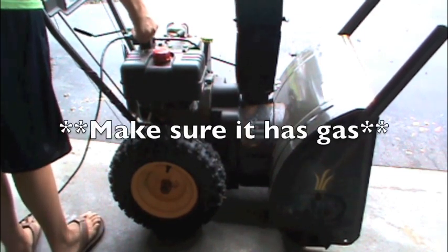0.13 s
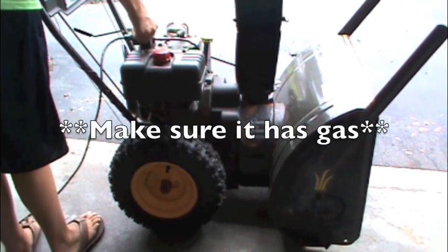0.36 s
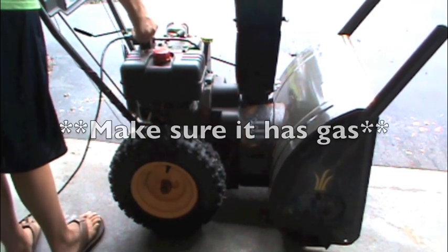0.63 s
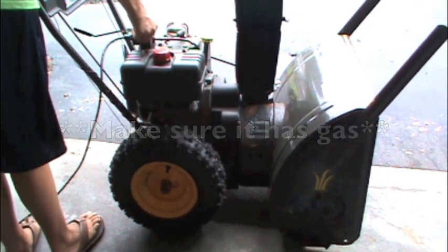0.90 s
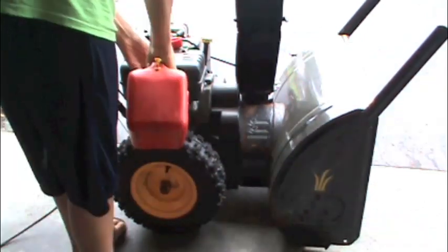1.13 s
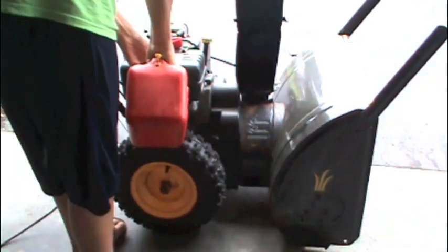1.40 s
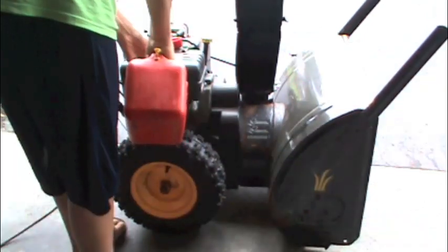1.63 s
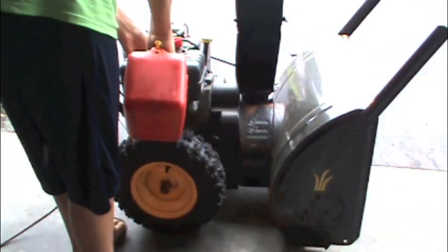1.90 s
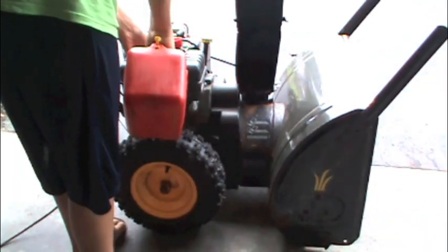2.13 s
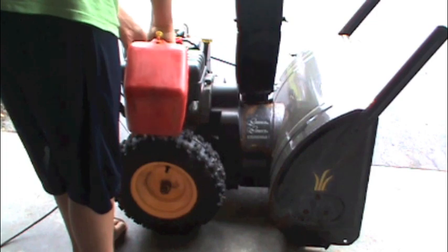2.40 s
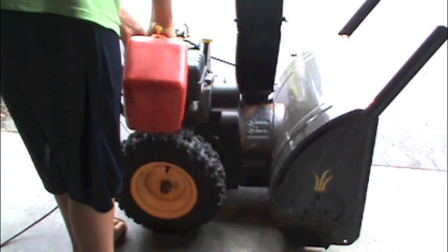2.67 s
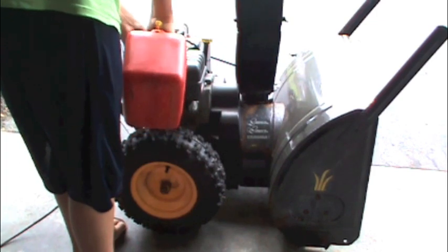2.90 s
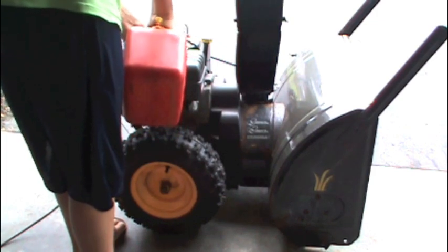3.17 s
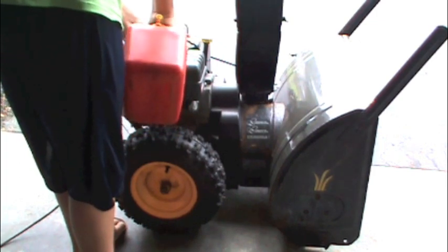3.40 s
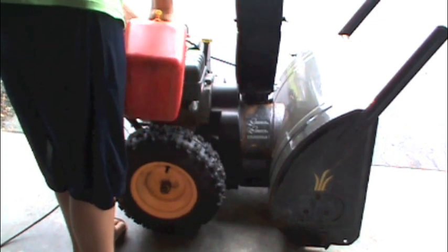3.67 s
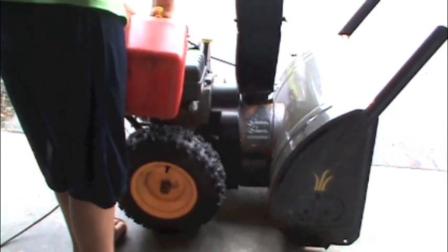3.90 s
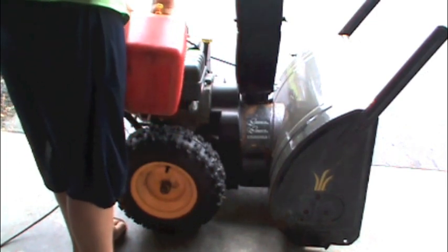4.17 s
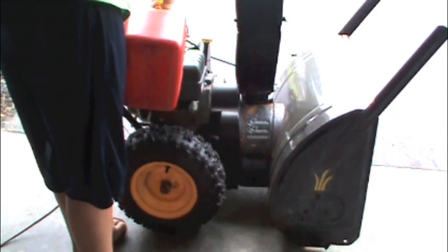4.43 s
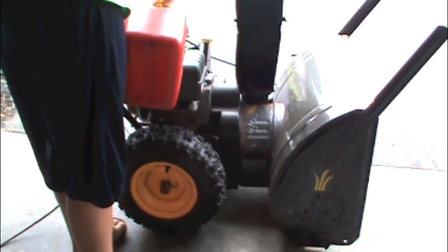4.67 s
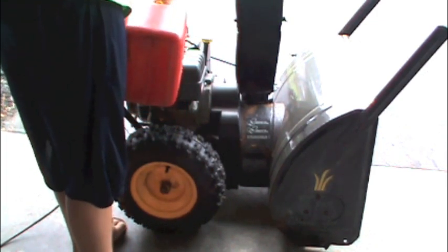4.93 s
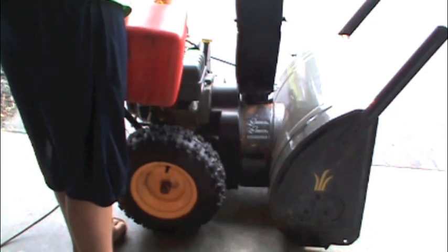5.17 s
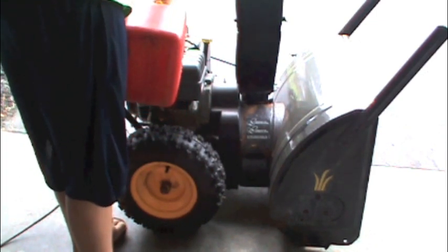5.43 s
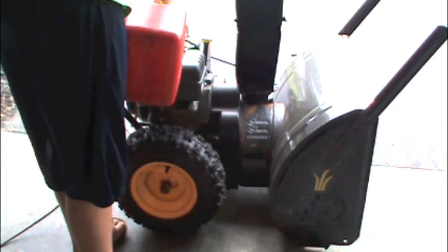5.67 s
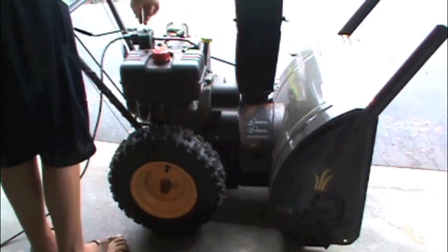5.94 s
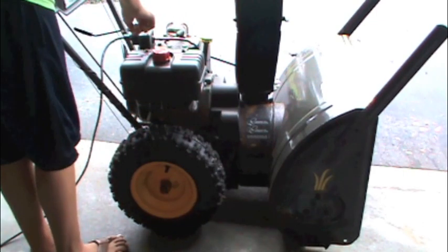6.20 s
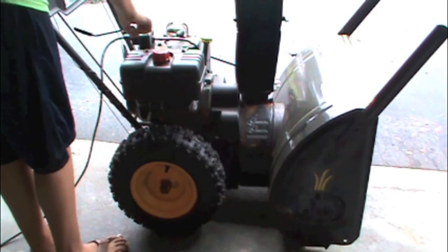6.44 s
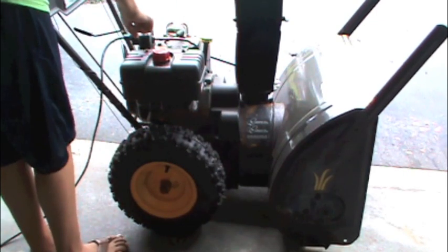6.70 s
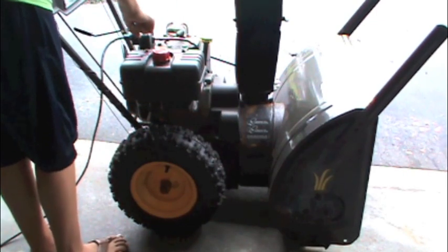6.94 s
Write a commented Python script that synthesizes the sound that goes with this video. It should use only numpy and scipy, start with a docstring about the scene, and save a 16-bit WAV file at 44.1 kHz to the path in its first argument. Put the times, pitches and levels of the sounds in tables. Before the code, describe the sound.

Harsh, pulsing starter-motor cranking, then near-silent outdoor hush with crickets, tiny clicks and can knocks, ending in a rough rising starter growl.

```python
"""At an open garage door, a mains electric starter cranks a small single-cylinder engine that does not catch.
Gear noise and a whine are paced by the pinion teeth on the flywheel gear, and air noise puffs out once a cycle.
After a fade, a quiet yard: filtered-noise rumble, traffic and crickets, steady hum tones, a buzzing, clicking
lens motor, a far bird's falling whistle, a plastic fuel can handled with noise rubs and ringing bursts, low knocks.
Past another fade in the yard, the starter is pressed again and its tooth tone climbs as it spins up."""
import sys
import numpy as np
from scipy import signal
from scipy.fft import rfft, irfft, next_fast_len
from scipy.io import wavfile
from scipy.ndimage import uniform_filter1d

SR = 44100
rng = np.random.default_rng(int(sys.argv[2]) if len(sys.argv) > 2 else 0)


def unload_audio(sound):
    """Save the sound as a 16-bit wav file, at the path given as the first command line argument."""
    columns = np.transpose(np.atleast_2d(sound))
    # keep every value between -1 and 1, then stretch to whole-number steps
    steps = np.round(np.clip(columns, -1, 1) * 32767)
    wavfile.write(sys.argv[1], SR, steps.astype(np.int16))


def boost(x):
    """Linear amplitude factor 10**(x/20) for a level x in decibels (scalar or array-like)."""
    u = np.asarray(x, float) / 20
    return 10 ** u


N = 311787
T = np.arange(N) / SR  # s

# All source levels are set ahead of the final gain; spectra are relative, as coloured() evens out their level.
# master fades: (time [s], gain [0-1])
FADER = [(0, 1), (.975, 1), (1.082, 0), (1.125, .3), (1.155, 1), (5.855, 1), (5.952, 0), (6.02, 1),
         (7.07, 1)]
CRANKING_END_S, SECOND_FADE_S = FADER[2][0], FADER[6][0]  # the moments of silence
# gear noise while cranking: (frequency [Hz], relative density [dB per Hz])
CRANK_SPECTRUM = [(18, -56), (30, -28.5), (93, -19), (161, -11), (252, -10), (287, -6), (328, -8),
                  (554, -6.5), (822, -9.5), (1720, -4.5), (2060, -12.5), (3980, -12), (5740, -14.5),
                  (6550, -12.5), (16000, -29)]
# housing, shroud and gear resonances: (frequency [Hz], width [Hz], boost [dB])
BODY = [(160.4, 14, 8), (221.7, 49, 6), (299, 12.7, 9), (408.4, 46, 4), (539.6, 50, 3), (671, 77, 1.5),
        (771, 43, 6), (984, 75, 4.5), (1172, 11, 5.5), (1318, 24, 3), (1504, 54, 3.5), (1742, 90, 2.5),
        (2334, 33, 4.5), (3142, 93, 1.5), (3910, 71, 3), (4810, 110, -1), (5190, 230, 1.5),
        (6375, 180, 2.5), (6700, 180, 0), (7060, 170, -3.5), (8760, 120, 4.5)]
# stereo width of starter and handling: (frequency [Hz], left-right likeness [-1 to 1])
STARTER_LIKENESS = [(30, .94), (100, 0.87), (300, 0.85), (1000, 0.79), (2000, 1), (3500, 1), (5500, 0.9),
                    (9000, 1), (15000, 0.85)]
# stereo phase of the starter: (frequency [Hz], lead of the left [rad])
STARTER_TURN = [(30, -.1), (120, -0.21), (300, -0.51), (800, -0.18), (2000, -0.62), (16000, 0.17)]


def in_time(rows):
    """Columns of a curve whose first column is time, one value a sample."""
    s, *columns = np.transpose(rows)
    return [np.interp(T, s, c) for c in columns]


def rms_one(x):
    """Scale to unit rms."""
    return x / np.sqrt(np.mean(x ** 2) + 1e-20)


def at_hz(points, hz):
    """Read a spectrum on a log-frequency axis."""
    point_hz, value = np.array(points)[:, 0], np.array(points)[:, 1]
    return np.interp(np.log(hz + 1), np.log(point_hz), value)


def drift(rate):
    """Random curve of unit rms: straight lines between chance values, rate of them per s."""
    return rms_one(np.interp(T * rate, np.arange(720), rng.standard_normal(720)))


def band(x, low_hz, high_hz):
    """Band-pass, then unit rms."""
    sos = signal.butter(2, [low_hz, min(high_hz, .45 * SR)], "band", fs=SR, output="sos")
    return rms_one(signal.sosfilt(sos, x))


def noise():
    """Two channels of white noise."""
    return rng.standard_normal((2, N))


def coloured(source, spectrum, likeness, peaks=(), lag=0, turn=((1, 0), (2, 0))):
    """Shape unrelated mid and side sources by spectrum, resonances, width and left lag or phase; unit rms."""
    size = next_fast_len(N)
    hz = np.arange(size // 2 + 1) * SR / size
    resonances_db = sum(db / (1 + (2 * (hz - f) / width) ** 2) for f, width, db in peaks)
    level_db = at_hz(spectrum, hz) + resonances_db
    alike = np.clip(at_hz(likeness, hz), -.99, .99)
    mid, side = rfft(source, size) * boost(level_db)
    left, right = np.sqrt(1 + alike) * mid + np.sqrt(1 - alike) * side * [[1], [-1]]
    left = left * np.exp(1j * (at_hz(turn, hz) - 2 * np.pi * hz * lag / SR))  # lag in samples
    return rms_one(irfft([left, right], size)[:, :N])


def split(x, low_hz, high_hz):
    """Low, middle and high parts from complementary filters, each then scaled to unit rms."""
    size = next_fast_len(N)
    hz = np.arange(size // 2 + 1) * SR / size
    low = 1 / (1 + (hz / low_hz) ** 4)
    high = 1 / (1 + (high_hz / (hz + 1)) ** 4)
    spectrum = rfft(x, size)
    return [rms_one(irfft(spectrum * part, size)[:, :N]) for part in (low, 1 - low - high, high)]


def burst(s, db, hz, octaves, t60):
    """A burst of noise in a band around hz, nearly central, dying exponentially for a quarter second."""
    out, length, at = np.zeros((2, N)), SR // 4, round(s * SR)
    white = rng.standard_normal((2, length))
    half = 2 ** (np.clip(octaves, .02, 3) / 2)
    fall = boost(db - 60 * np.arange(length) / SR / np.clip(t60, .01, .4))
    out[:, at:at + length] = fall * band(white[0] + 0.14 * white, hz / half, hz * half)
    return out


def grind(tooth_turns, gating, rattle_per_s, rattle_db):
    """Friction noise pressed harder at each tooth contact, with loose rattling clicks."""
    contact = 1 + gating * np.cos(2 * np.pi * tooth_turns)
    sizes = boost(3.0 * np.minimum(rng.exponential(1, (2, N)), 4)) * rng.choice([-1, 1], (2, N))
    clicks = rms_one(sizes * (rng.random((2, N)) < rattle_per_s / SR))
    return noise() * contact * boost(0.86 * drift(45.0)) + boost(rattle_db) * clicks


def rattle(per_s):
    """Loose parts knock at random, each knock ringing one body resonance."""
    out = np.zeros(N)
    for hz, width, db in BODY:
        knocks = rng.standard_normal(N) * (rng.random(N) < per_s / SR) + 1e-18
        # two-pole resonator, narrower than the body peak
        r, w = np.exp(-np.pi * width * .6 / SR), 2 * np.pi * hz / SR
        ring = rms_one(signal.lfilter([1], [1, -2 * r * np.cos(w), r * r], knocks))
        out += boost(at_hz(CRANK_SPECTRUM, hz) + db) * np.sqrt(width) * ring
    return rms_one(out)


def cranking():
    """The starter turns the engine over; speed sags at each compression and a puff of air follows."""
    # air puff: (frequency [Hz], relative density [dB per Hz])
    puff_spectrum = [(5000, -38.5), (8000, -5.5), (9000, -2), (11500, -4.5), (13000, -7), (15000, -3),
                     (16000, -10)]
    # its stereo width: (frequency [Hz], left-right likeness [-1 to 1])
    puff_likeness = [(5000, 0.9), (9500, 0.88), (16000, .6)]
    cycle_per_s, cycle_start = 7.72, 0.345  # start as share of an engine cycle
    tooth_hz, tooth_swing = 550, 0.055  # swing as share of the rate
    gears_db, puff_db, puff_pan_db = -13, -18.5, 2.5  # pan is left over right

    place = (cycle_per_s * T + cycle_start) % 1
    # the puff opens fast, holds to about a quarter of the cycle and leaks away
    opening = np.clip(place / 0.095, 0, 1) * boost(-100.0 * np.maximum(place - .24, 0))
    speed = 1 + tooth_swing * np.sin(2 * np.pi * place) + .015 * drift(25.15)
    turns = np.cumsum(tooth_hz * speed) / SR

    friction = grind(turns, 0.44, 900, -4.5)
    gears = coloured(friction, CRANK_SPECTRUM, STARTER_LIKENESS, BODY, turn=STARTER_TURN)
    gears = gears + boost(-6) * rattle(60)
    # the upper grind surges once a turn, twice a cycle; the lower part dips under the puff
    surge_db = 1.2 * np.cos(4 * np.pi * (place - .42)) + 0.55 * drift(18.2)
    upper = signal.sosfiltfilt(signal.butter(2, 1900, "high", fs=SR, output="sos"), gears)
    gears = (gears - upper) * boost(-2.0 * opening) + upper * boost(surge_db)

    whine = boost(-33.0 + 2.7 * drift(20.0)) * np.sin(2 * np.pi * turns)
    whine += boost(-27.0 + 1.1 * drift(60.0)) * np.sin(4 * np.pi * turns)
    puff_gain = boost(puff_db + puff_pan_db * np.array([[.5], [-.5]]))
    puff = puff_gain * opening * coloured(noise(), puff_spectrum, puff_likeness)
    return (boost(gears_db) * gears + whine + puff) * (T < CRANKING_END_S)


def yard():
    """Distant rumble and traffic, air hiss and microphone hiss as filtered noise; electrical tones as sines."""
    # far traffic: (time [s], murmur level [dB])
    murmur = [(1.25, -54.5), (1.5, -56.5), (3.2, -56.5), (4.2, -57.5), (5.1, -55), (5.85, -56), (6.04, -50),
              (6.2, -53), (6.62, -54)]
    # outdoor noise: (frequency [Hz], relative density [dB per Hz])
    air = [(12, -55), (20, -39), (49, 2.5), (110, -1), (177, -11.5), (204, -15), (228, -14.5), (347, -16.5),
           (780, -17), (1000, -16.5), (1760, -24.5), (2460, -23), (2750, -25.5), (7110, -29.5),
           (16000, -43)]
    # its stereo width: (frequency [Hz], left-right likeness [-1 to 1])
    yard_likeness = [(20, 0.77), (60, 1), (130, 1), (290, 0.68), (640, 0.53), (1400, 0.38), (3100, 0.36),
                     (7000, 0.041)]
    # steady electrical tones: (frequency [Hz], level [dB rms])
    hum = [(119.6, -65), (239.5, -75), (359.7, -76), (839.8, -73), (1260, -84), (2519.4, -72.5),
           (3359, -83), (5039, -82), (15734, -82)]
    rumble_mean_db, rumble_follows = -57.5, .7  # level at mean murmur; share of its swing
    hiss_db, mic_hiss_db = -61, -64

    [murmur_db] = in_time(murmur)
    rumble_db = rumble_mean_db + rumble_follows * (murmur_db - murmur_db.mean())
    # sound from the open door reaches the left 8 samples later
    low, middle, high = split(coloured(noise(), air, yard_likeness, lag=8), 154, 1850)
    out = boost(rumble_db + 1.44 * drift(8.0)) * low + boost(murmur_db) * middle + boost(hiss_db) * high
    out += boost(mic_hiss_db) * band(rng.standard_normal(N), 3700, 20300)
    for hz, db in hum:
        out += np.sqrt(2) * boost(db + 1.1 * drift(5.5)) * np.sin(2 * np.pi * hz * T)
    return out


def crickets():
    """Narrow bands of noise switched on in regular chirps, leaning to the left."""
    # (start [s], stop [s], frequency [Hz], width [Hz], chirp rate [per s], place at 0 s [0-1],
    #  duty [0-1], level [dB])
    calls = [(1.1, 5.95, 7220, 200, 14.56, .38, .55, -72), (5.95, 6.64, 8270, 120, 52.5, .24, .85, -70),
             (1.1, 6.64, 4450, 300, 29.1, .5, .8, -77)]
    out = 0
    for start, stop, hz, width, rate, place, duty, db in calls:
        phase = (rate * T + place + duty / 2) % 1
        chirp = np.sin(np.pi * np.clip(phase / duty, 0, 1))
        tone = band(band(noise(), hz - width / 2, hz + width / 2), hz - width, hz + width)
        sounding = (T > start) * (T < stop)
        out = out + boost(db + drift(7.4)) * chirp * (tone[0] + .5 * tone) * sounding
    return out


def lens_motor():
    """A lens motor steps at a steady rate: each step a short harmonic buzz with a faint starting tick."""
    # when the motor runs: (start [s], stop [s])
    runs = [(1.13, 1.63), (4.5, 4.68), (4.73, 5.56)]
    # its tone: (multiple of the fundamental [1], level while sounding [dB rms])
    partials = [(2, -67), (3, -69), (4, -69), (5, -77)]
    motor_hz, step_hz, duty = 954, 29.97, .58  # duty as share of a step

    running = sum((T > start) * (T < stop) for start, stop in runs)
    place = (step_hz * T) % 1
    tone = sum(boost(db + 1.1 * drift(25)) * np.sin(2 * np.pi * k * motor_hz * T) for k, db in partials)
    tick = boost(-59.5 - 150 * place + 2 * drift(30)) * band(rng.standard_normal(N), 1800, 5200)
    gate = uniform_filter1d(running * (place < duty) * 1., size=90)  # soft edges
    return np.sqrt(2) * gate * tone + running * tick


def bird():
    """One faint, falling whistle of a far bird: a sine wavering in pitch and level."""
    # (time [s], frequency [Hz], level [dB rms])
    whistle = [(1.3, 3900, -88), (1.4, 3750, -73), (1.5, 3600, -69), (1.56, 3250, -70), (1.63, 3100, -78),
               (1.66, 3050, -99)]
    hz, db = in_time(whistle)
    turns = np.cumsum(hz * (1 + .006 * drift(65.0))) / SR
    return np.sqrt(2) * boost(db + 2 * drift(40.0)) * np.sin(2 * np.pi * turns)


def handling_and_clicks():
    """Rubs, cap squeaks and blows ring the can as noise bursts; low knocks and dry clicks, some the lens motor's."""
    # rubbing noise: (frequency [Hz], relative density [dB per Hz])
    rustle = [(500, -5), (1500, -5), (4000, -4.5), (7500, -6), (11500, -9), (16000, -14.5)]
    # hands and clothes rub on the can: (time [s], length [s], level [dB], dull over bright part [dB])
    scuffs = [(4.59, 0.39, -66, -5), (5.065, 0.8, -63, -2.2), (5.194, 0.077, -62.5, -3),
              (5.43, 0.047, -65, -20), (5.56, 0.039, -69, -16), (5.673, 0.18, -59, 1)]
    # the cap squeaks: (time [s], starting level [dB], ring frequency [Hz])
    squeaks = [(4.5925, -49.5, 7300), (4.6194, -57, 7560), (5.0619, -49, 7690), (5.1894, -52, 6750),
               (5.2894, -56, 7370), (5.4694, -51, 7100), (5.5806, -47, 7300)]
    # dry broad clicks, some of them the lens motor starting and stopping:
    # (time [s], starting level [dB], centre frequency [Hz])
    clicks = [(1.650, -49.5, 2700), (1.650, -58, 10500), (4.486, -51.5, 2600), (4.590, -67, 11000),
              (4.705, -50.5, 5040), (4.799, -58, 10200), (4.871, -54, 10000), (5.062, -53, 9000),
              (5.452, -53, 9500), (5.681, -50.5, 3500), (5.73, -53, 10300), (5.785, -48, 11000),
              (6.277, -51, 3000)]
    # modes of the hollow can: (frequency [Hz], level [dB], time to fall 60 dB [s])
    can = [(179, -3, 0.28), (447, 3, 0.13), (530, -7, 0.23), (630, -3.5, 0.19), (1560, -3.5, 0.13),
           (1690, -4, .11), (2000, -2, 0.17), (2800, -2, 0.072), (3250, -5.5, .13), (3500, -5, 0.12)]
    # blows on the can, where the spot struck favours modes near one pitch, and last two low knocks,
    # perhaps on another object, made from the same modes:
    # (time [s], starting level [dB], favoured frequency [Hz], reach [octaves])
    blows_and_knocks = [(4.871, -46, 540, .15), (5.2215, -44.5, 3550, 0.12), (5.229, -49, 1500, .15),
                        (5.272, -51, 3400, .15), (5.679, -47, 470, 1.9), (5.698, -45, 2410, .5),
                        (5.783, -45, 3150, .3), (5.810, -49, 1720, .15), (5.851, -55, 700, 1.2),
                        (5.958, -37.5, 637, 0.17), (5.981, -38, 179, .3)]
    rub_attack_s, rub_release_s = 0.013, 0.099  # release is the time constant
    ring_octaves, squeak_t60_s = .17, 0.14
    click_octaves, click_t60_s = 1.2, 0.056

    rubbing = coloured(grind(0, 0, 300, -7.5), rustle, STARTER_LIKENESS)
    _, dull, bright = split(rubbing, 300, 4800)
    dull, bright = boost(1.1 * drift(38.0)) * dull, boost(2.5 * drift(22.05)) * bright
    out = 0
    for s, length, db, dull_db in scuffs:
        attack = np.clip((T - s) / rub_attack_s, 0, 1)
        stroke = attack * np.exp(-np.maximum(T - s - length, 0) / rub_release_s)
        out = out + boost(db) * stroke * (bright + boost(dull_db) * dull)
    out = out * (T < SECOND_FADE_S)

    out += sum(burst(s, db, hz, ring_octaves, squeak_t60_s) for s, db, hz in squeaks)
    out += sum(burst(s, db, hz, click_octaves, click_t60_s) for s, db, hz in clicks)
    for s, db, favoured_hz, reach in blows_and_knocks:
        for hz, mode_db, t60 in can:
            off_pitch_db = -6 * (np.log2(hz / favoured_hz) / reach) ** 2
            out += burst(s, db + mode_db + off_pitch_db, hz, ring_octaves, t60)
    return out


def spin_up():
    """The starter bites and labours up to speed: the tooth tone climbs; growl and mains buzz follow the load."""
    # (time [s], tooth rate [Hz], load on the starter [0-1])
    spin = [(6.665, 228, 1), (6.735, 282.1, 1.0), (6.775, 298, 1), (6.81, 338.8, 1), (6.86, 480, 0.4),
            (6.927, 572, 0.3), (7.055, 565, 0.35)]
    # gear noise: (frequency [Hz], relative density [dB per Hz])
    spin_spectrum = [(24, -69.5), (40, -38), (85, -36), (151, -4), (194, -12), (297, -6), (444, -5.5),
                     (556, -4), (831, -12.5), (1300, -9.5), (2050, -18.5), (9690, -32.5), (16000, -42.5)]
    start_s, rise_s = 6.637, .024
    # levels unloaded, and what full load adds
    grind_db, grind_load_db = -13, -0.5
    growl_db, growl_load_db = -26.5, 9
    buzz_db, buzz_load_db = -36.5, 3
    brush_db, brush_load_db = -22.5, -2.5
    # the tooth tone firms up once the pinion is home
    mesh_s, mesh_rise_s, tone_db, tone_loose_db = 6.72, 0.019, -19.5, -17
    # gaining speed weakens the tone (dB per kHz/s) and roughens its pitch (share per kHz/s)
    blur_db, blur_wobble = -3.5, .02
    bite_s, bite_db, bite_t60_s = 6.668, -20.5, 0.34  # bright scrape as the pinion bites

    tooth_hz, load = in_time(spin)
    gaining = uniform_filter1d(np.abs(np.gradient(tooth_hz)) * SR / 1000, size=900)  # kHz per s
    turns = np.cumsum(tooth_hz * (1 + (0.0039 + blur_wobble * gaining) * drift(60.0))) / SR
    tooth = 2 * np.pi * turns

    friction = grind(turns, 0.19, 830, -10.5)
    gears = coloured(friction, spin_spectrum, STARTER_LIKENESS, BODY, turn=STARTER_TURN)
    gears = gears + boost(-16.5) * rattle(76.0)
    low, middle, high = split(gears, 450, 5500)
    growl = boost(growl_db + growl_load_db * load)
    bite = boost(bite_db - 60 * np.maximum(T - bite_s, 0) / bite_t60_s) * (T > bite_s)
    brush = boost(brush_db + brush_load_db * load)
    out = growl * low + boost(grind_db + grind_load_db * load) * middle + np.hypot(brush, bite) * high

    loose = np.clip(1 - (T - mesh_s) / mesh_rise_s, 0, 1)
    tone_gain = boost(tone_db + tone_loose_db * loose + blur_db * gaining + 1.8 * drift(30.0))
    out += np.sqrt(2) * tone_gain * (np.sin(tooth) + 0.35 * np.sin(2 * tooth))
    # uneven teeth smear the tone into a rough growl that climbs with it
    out += boost(-6.5) * growl * drift(70.0) * (np.cos(tooth) + .5 * np.cos(tooth / 2))
    buzz_gain = boost(buzz_db + buzz_load_db * load + 3.0 * drift(20.0))
    out += np.sqrt(2) * buzz_gain * np.sin(2 * np.pi * 120 * T)
    return out * np.clip((T - start_s) / rise_s, 0, 1)


def scene():
    """Cranking, then the quiet yard, then the spin-up over the yard, all under the master fades."""
    quiet = yard() + crickets() + lens_motor() + bird() + handling_and_clicks()
    quiet = quiet * (T > CRANKING_END_S)
    [gain] = in_time(FADER)
    return gain * (cranking() + quiet + spin_up())


def roll_off(x):
    """The treble ends steeply here."""
    return signal.sosfilt(signal.butter(12, 16520, fs=SR, output="sos"), x)


def record(dry):
    """The microphone leans right and sheds the deepest bass, loud peaks are rounded and the top is cut."""
    balanced = dry * boost(-.35 * np.array([[.5], [-.5]]))  # dB, left over right
    thinned = signal.sosfilt(signal.butter(2, 35.0, "high", fs=SR, output="sos"), balanced)
    rounded = 0.59 * np.tanh(thinned / 0.8)
    top_cut = signal.cheby2(16, 60, 16300, fs=SR, output="sos")
    mix = signal.sosfilt(top_cut, rounded)
    return roll_off(mix)


dry = scene()
out = record(dry)
unload_audio(out)
```